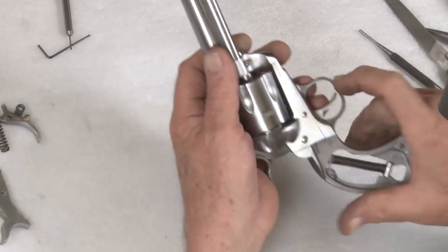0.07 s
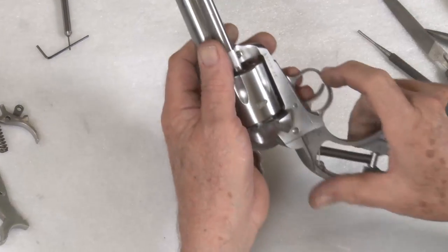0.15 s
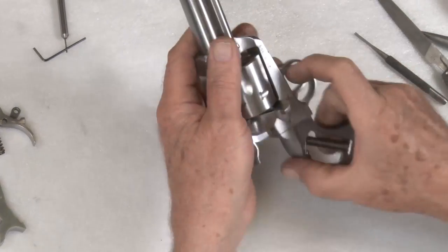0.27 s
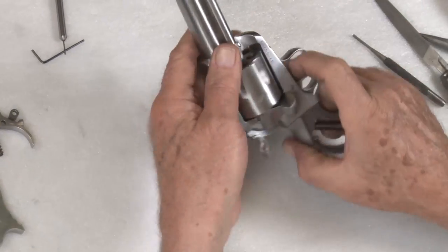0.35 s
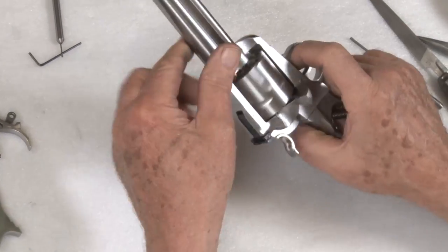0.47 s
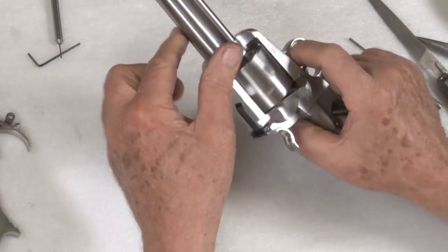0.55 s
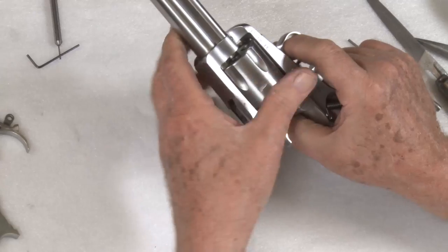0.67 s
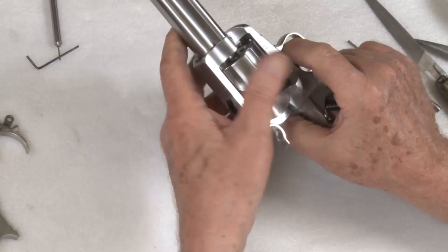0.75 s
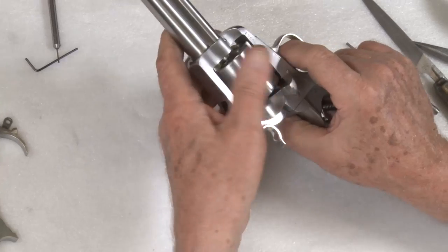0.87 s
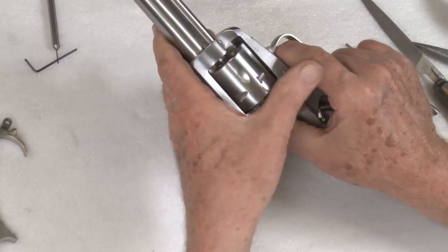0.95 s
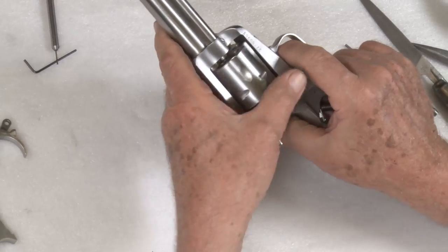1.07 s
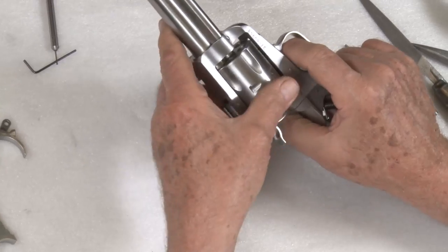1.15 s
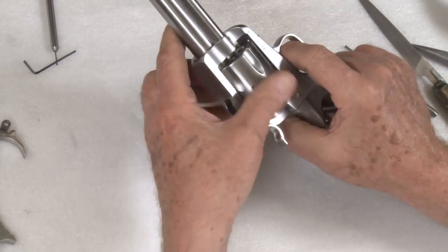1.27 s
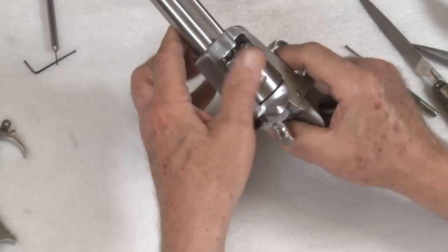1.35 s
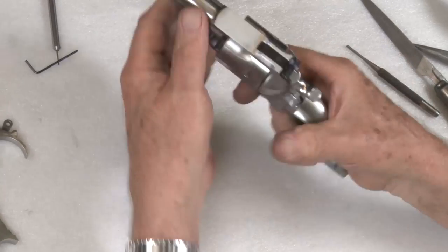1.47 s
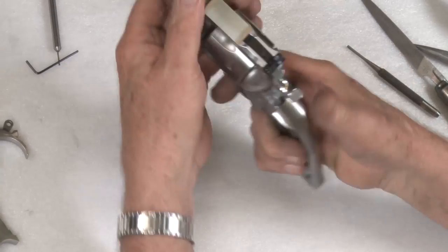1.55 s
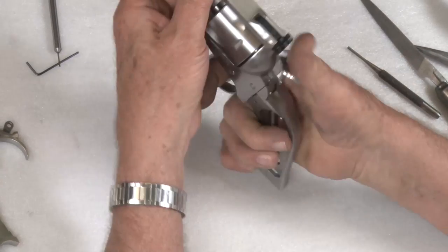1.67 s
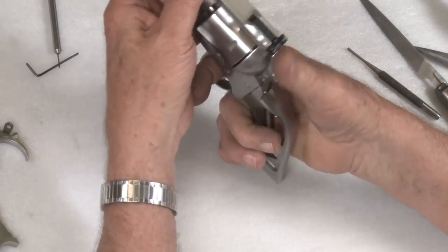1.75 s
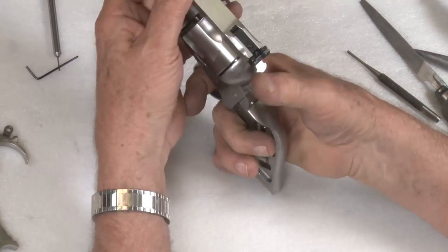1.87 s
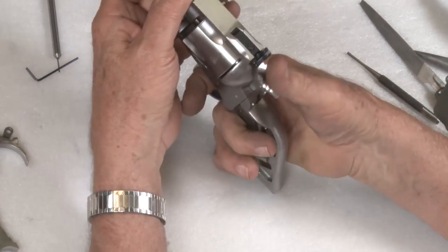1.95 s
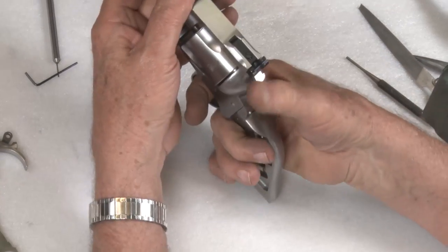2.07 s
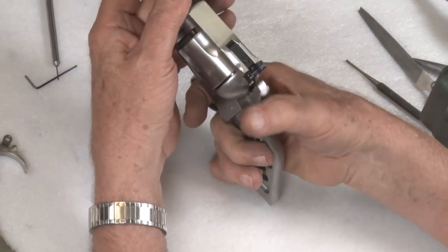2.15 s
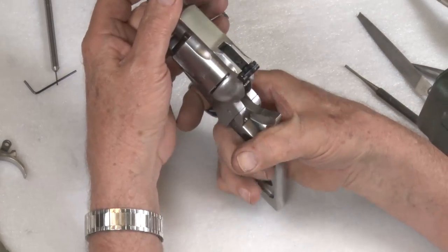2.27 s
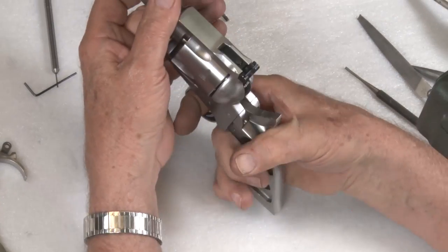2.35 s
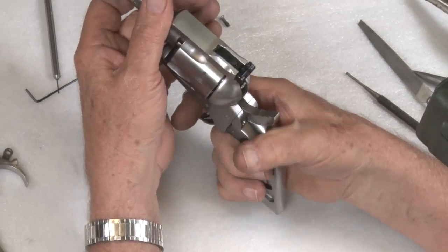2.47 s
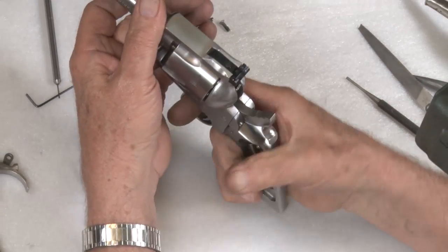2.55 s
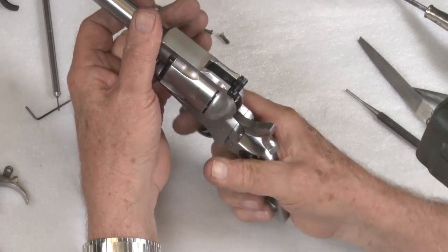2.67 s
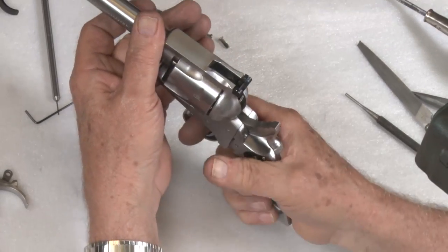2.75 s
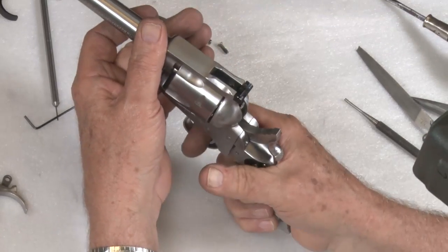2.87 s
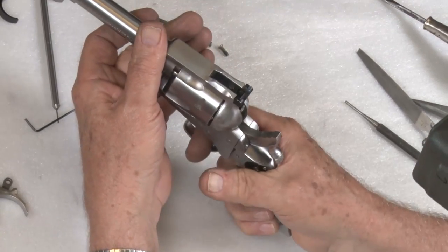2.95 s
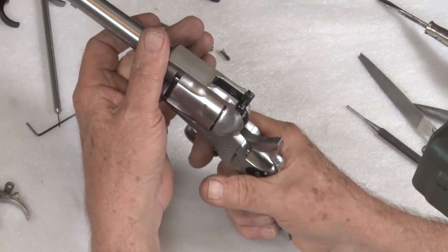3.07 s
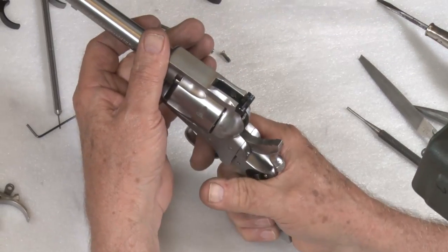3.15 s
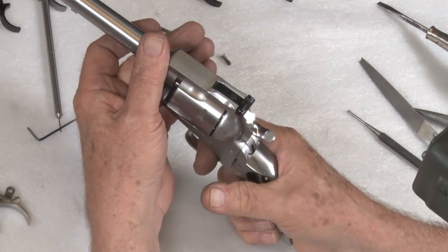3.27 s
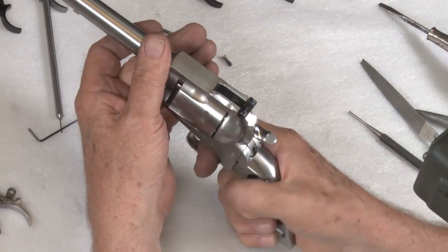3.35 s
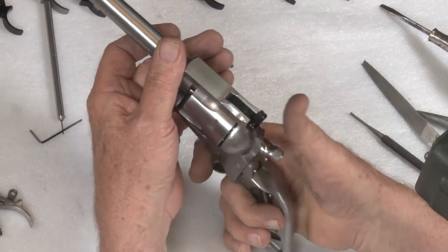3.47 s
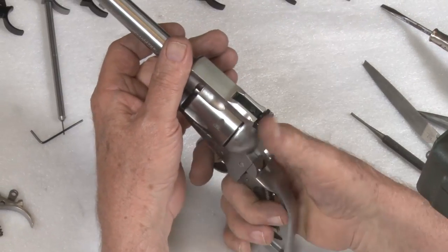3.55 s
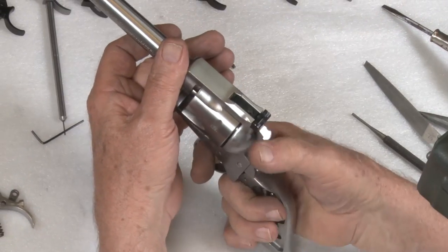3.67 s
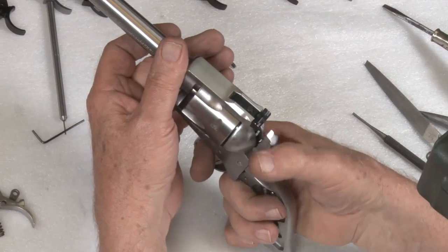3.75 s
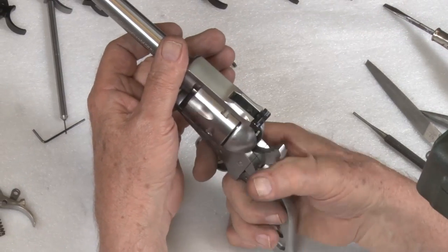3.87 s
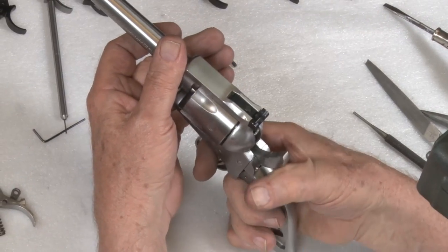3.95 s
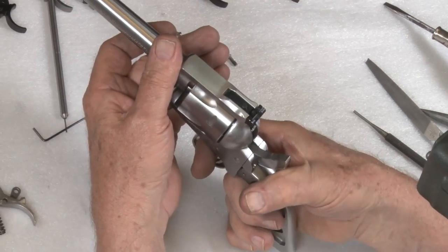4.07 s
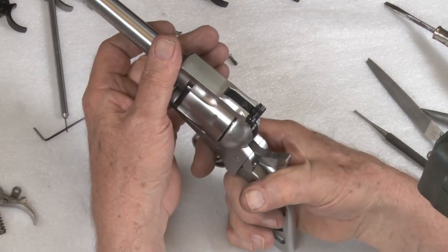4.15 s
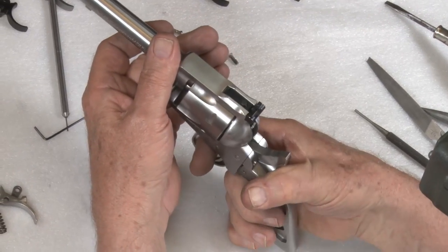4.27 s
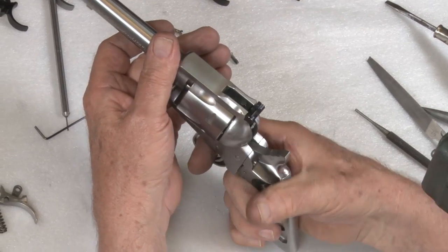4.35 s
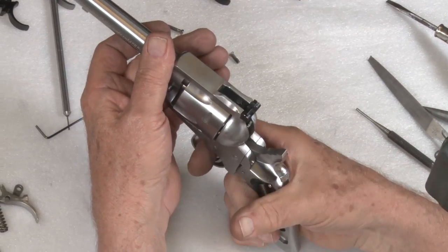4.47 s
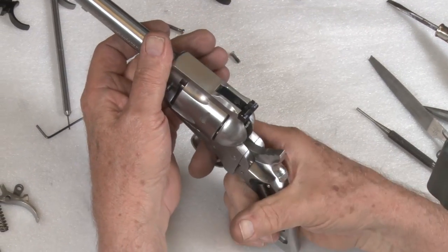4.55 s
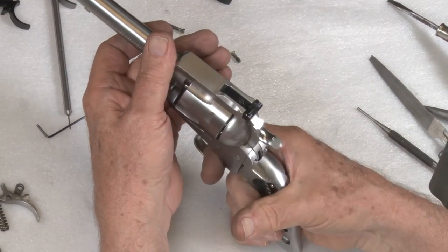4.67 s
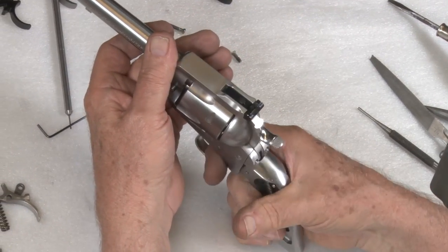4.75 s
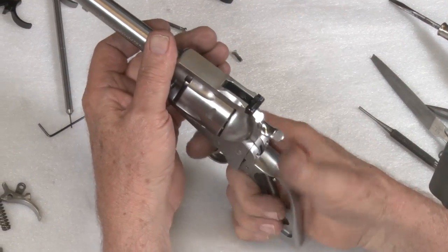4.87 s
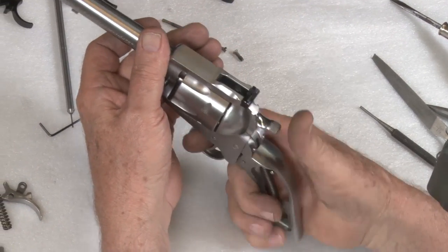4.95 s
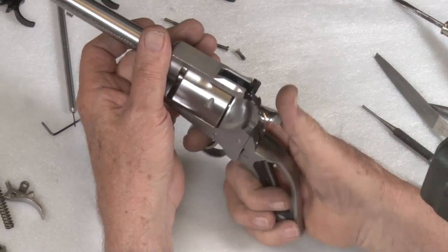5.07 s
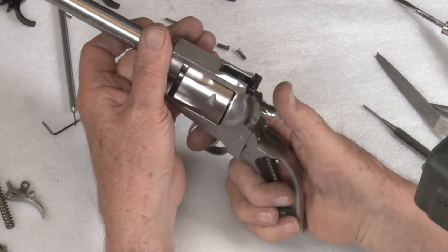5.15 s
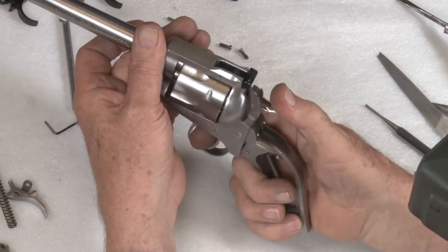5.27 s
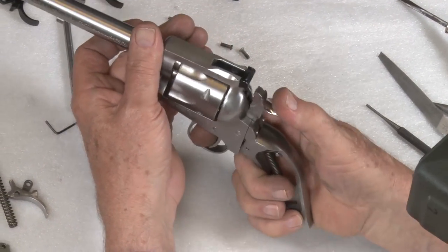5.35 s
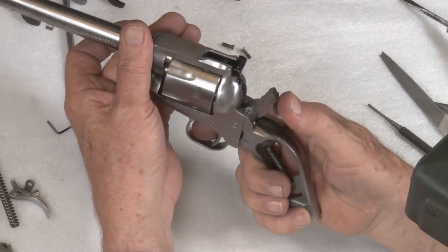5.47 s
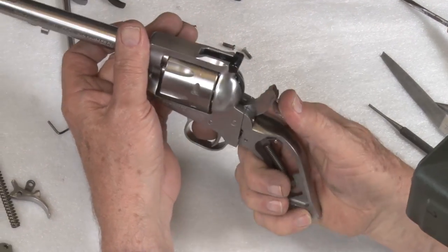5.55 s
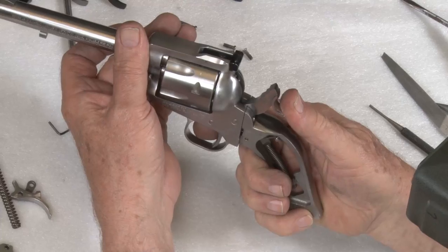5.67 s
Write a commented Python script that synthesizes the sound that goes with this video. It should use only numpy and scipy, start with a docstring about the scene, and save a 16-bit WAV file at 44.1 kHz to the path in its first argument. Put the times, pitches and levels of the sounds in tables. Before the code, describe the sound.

A steel revolver is handled very close to the microphone in a still, small workshop with faint mains hum. Skin rubs and hisses over metal from the start until about 0.5 s, with a light clink at 0.4. From 0.46 to 0.69 s, five bright ratchet clicks run quickly together, trailing a thin springy ring. After a quiet gap, a tight cluster of snaps comes at 1.2 s. Soft rubbing follows near 1.6, then several firm clicks and low handling thuds between 2.2 and 2.4 s, with duller bumps around 3.0. At 3.26 s the hammer falls with a hard, thudding clack and shimmering spring; the trigger returns sharply at 3.48. Cocking clicks at 3.9 and 4.1 lead to a second, slightly softer fall at 4.76 and return snap at 4.93. Gentle rubbing and faint ticks follow from 5.2 s, ending in a crisp double click around 5.5. Short, bright reflections follow the blows.

```python
"""A single-action revolver is worked by hand over a padded bench in a small workshop, close to the microphone.
The cylinder turns over its ratchet, then the hammer is cocked and let go: steel snaps as cracks, noise and tones.
The mainspring and the pawl's spring ring on as dense, fading noise; low fading sines make the gun's thuds.
Filtered noise makes the hands' rubbing and the still air, steady sines the faint mains hum,
and scattered reflections the room."""
import sys
import numpy as np
from scipy import signal
from scipy.fft import rfft, irfft
from scipy.io import wavfile

SR = 44100
rng = np.random.default_rng(int(sys.argv[2]) if len(sys.argv) > 2 else 0)


def unload_wav(signal):
    """Save mono or channel-first audio to the path in sys.argv[1] as 16-bit WAV at rate SR, clipped to [-1, 1]."""
    wavfile.write(
        sys.argv[1],
        SR,
        np.round(np.clip(np.atleast_2d(signal).T, -1, 1) * 32767).astype(np.int16),
    )


N = 251370
TIME = np.arange(N) / SR

# In all tables, t60 is the time a sound takes to fade by 60 dB.
# Colours are spectrum shapes and modes are resonances; their levels are relative.

# skin slides on steel: (time of full strength [s], hold [s], dull rub [dB], scrape [dB], hiss [dB])
STROKES = [(0, 0.068, -58, -65.5, -62), (0.143, 0.14, -55, -70.5, -65), (0.304, 0.13, -57, -71, -67),
           (1.615, 0.15, -68.5, -73.5, -77), (2.309, 0.082, -57.5, -71, -76), (2.78, 0.15, -65, -75.5, -87),
           (2.98, 0.23, -67.5, -81.5, -80), (5.234, 0.33, -66.5, -77, -81)]
# spectrum of the dull rub: (frequency [Hz], level [dB])
RUB_COLOUR = [(18, -35), (30, 5), (91, -2.5), (237, -3.5), (527, -13.5), (647, -13.5), (827, -14),
              (1010, -30.5), (1950, -25), (4000, -42.5), (5200, -78), (8800, -120)]
# spectrum of the skin's hiss: (frequency [Hz], level [dB])
HISS_COLOUR = [(1200, -4.5), (2100, -1), (3200, -9), (5000, -7), (6500, -10.5), (9300, -6.5),
               (11500, -18.5), (15500, -15)]
# band of the scrape, where fingertip ridges catch and slip: (low [Hz], high [Hz])
SCRAPE_HZ = (450, 2120)
# spectrum of the still air: (frequency [Hz], level [dB])
AIR_COLOUR = [(12, -20), (20, -4.5), (65, 6.5), (88, -10), (107, 1.5), (146, -10), (182, -0.5),
              (210, -19.5), (241, -7), (270, -13), (301, -12), (2080, -22.5), (2320, -28), (3250, -24),
              (16000, -32)]
# mains hum: (frequency [Hz], level [dB])
HUM = [(60, -78), (120, -76), (180, -89.5), (240, -77.5), (300, -86.5), (480, -98)]

# ranges of knock, clack, ring, edge and sizzle: (low [Hz], high [Hz])
RANGES = [(130, 700), (850, 2800), (2800, 5600), (5600, 10000), (10000, 16500)]
# resonances of the steel frame: (frequency [Hz], width [Hz], level [dB])
FRAME_MODES = [(1800, 58, -32), (2890, 100, -17), (4100, 180, 7.5), (4610, 280, 6.5), (6050, 68, -2),
               (7080, 130, 4.5), (9120, 140, 10), (9470, 280, 6), (10450, 320, -15), (12200, 160, -24),
               (12900, 170, -12), (14430, 190, 9)]
# dull taps of parts eased together: (time [s], level [dB], brightness [dB per octave], ping [Hz])
TAPS = [(0.3152, -64.5, .5, 2590), (0.4172, -43.5, 2.5, 3680), (1.208, -46.5, 4, 3720),
        (1.6156, -66, -5, 1840), (2.24, -58, 6, 5030), (2.2475, -55, -2.5, 3830), (3.838, -68, 9, 5090),
        (3.8446, -55.5, 0, 2040), (5.4562, -51, -2, 2330), (5.4608, -57, -5, 2310), (5.5253, -42, 8, 2966)]
# balance of every tap: (knock [dB], clack [dB], ring [dB], edge [dB], sizzle [dB])
TAP_DB = (-23.5, -2, 0, -20, -36)
# spectrum of the room's tail: (frequency [Hz], level [dB])
ROOM_COLOUR = [(200, 2.5), (800, -19), (2000, 0), (4000, 3), (7000, -0.5), (11000, 1.5), (15000, 5.5)]
# fading of the room's tail: (frequency [Hz], t60 [s])
ROOM_T60 = [(300, 0.51), (2000, 1), (4000, 0.78), (8000, 0.58), (14000, 0.24)]

# the pawl drops over a ratchet tooth: (time [s], level [dB], frame knock [dB], t60 [s], tooth's ping [Hz])
RATCHET = [(0.4579, -38, -5, 0.037, 7320), (0.519, -40, -17.5, 0.049, 5000),
           (0.5611, -42, -11.5, 0.059, 3070), (0.6116, -39, -10.5, 0.057, 6320),
           (0.685, -39.5, -6.5, 0.06, 13600)]
# balance of every tooth: (clack [dB], ring [dB], edge [dB], sizzle [dB])
TOOTH_DB = (-6, -0.5, 2.5, 1.5)
# resonances of the steel cylinder: (frequency [Hz], width [Hz], level [dB])
CYLINDER_MODES = [(3280, 1100, -5), (4450, 61, 7.5), (5440, 89, -2), (7300, 280, 0), (8100, 260, 1.5),
                  (9600, 180, -14), (10280, 50, 9), (11500, 86, -6), (12840, 70, 14), (14200, 110, 7),
                  (15360, 76, 7)]
# spectrum of the spring behind the pawl: (frequency [Hz], level [dB])
PAWL_COLOUR = [(1000, -9), (2400, -20), (3200, -1), (4400, 10), (7000, 5), (10000, -2), (13000, 7),
               (15500, 9)]
# fading of that spring: (frequency [Hz], t60 [s])
PAWL_T60 = [(3000, 0.64), (7000, 0.77), (14000, 0.41)]

# hands bump the gun as they shift: (time [s], level [dB], frequency [Hz])
BUMPS = [(0.563, -42.5, 100), (2.307, -42, 74), (2.321, -41, 134), (2.344, -42, 177), (2.364, -36, 52),
         (2.375, -42, 191), (2.409, -39, 64), (2.989, -49, 55), (3.053, -45.5, 57.4), (3.129, -44, 52.4)]
# the gun rocks in the grip: (frequency [Hz], level relative to the jolt [dB], t60 [s])
ROCKING = [(38.5, -10.5, 0.18), (75.6, 1.5, 0.033)]
# gate, bolt and sear snap home under their springs:
# (time [s], level [dB], frame knock [dB], brightness [dB per octave], t60 [s], ping [Hz])
SNAPS = [(1.185, -52.5, -2, 2, 0.029, 3270), (1.188, -44, 6, 0.6, 0.053, 10000),
         (1.1916, -45, -2, 5.5, 0.035, 12100), (1.204, -47, 4, 4, 0.019, 12170),
         (2.202, -55, -7, 2, 0.038, 14180), (2.2099, -56, -3.5, -2.3, 0.095, 14000),
         (2.2889, -42, 8.5, 0.7, 0.058, 1970), (2.3077, -38, 2, 1.5, 0.032, 14400),
         (2.361, -38, -4.5, -.5, 0.044, 3770), (3.7628, -61, -8, 1, 0.043, 14100),
         (3.8972, -43.5, 1, 0.9, 0.037, 5140), (3.93, -44, 2, 1.5, 0.055, 6070),
         (4.102, -43.5, 3.5, 0.9, 0.037, 12900), (4.3931, -62, -1.5, -1.3, 0.036, 2000),
         (5.3555, -59, 2, 1.7, 0.03, 4940), (5.371, -66.5, 0, 2, 0.046, 14300),
         (5.504, -42, -3.5, -.3, .05, 2240), (5.526, -44, -20, 1, 0.034, 4380)]
# balance of every snap: (knock [dB], clack [dB], ring [dB], edge [dB], sizzle [dB])
SNAP_DB = (-10.5, -3.5, 0, -3, -2)
# the hammer is let go and lands: (time [s], level [dB], grip's resonance [Hz])
FALLS = [(3.2631, -40.5, 293), (4.7564, -45, 390)]
# in each fall the sear slips, then the hammer brushes, lands and bounces twice: (time from landing [s],
# relative level [dB], frame knock [dB], brightness [dB per octave], t60 [s], ping [Hz])
FALL_CONTACTS = [(-.0117, -15.5, 3.5, -3.5, 0.15, 4450), (-.0036, -2, -4, 0, 0.028, 6360),
                 (0, 2.5, 1, -1, 0.037, 1220), (.0075, -3, 1, -2, .046, 12760),
                 (0.0108, -3, 0, 7.5, 0.053, 14940)]
# the released trigger springs forward to its stop: (time [s], level [dB], grip's resonance [Hz])
RETURNS = [(3.4821, -34, 327), (4.929, -34, 165)]
# its lever clinks past the hammer, then it hits its stop: (time from the stop [s],
# knock [dB], clack [dB], ring [dB], edge [dB], sizzle [dB], t60 [s], ping [Hz], ping [dB])
RETURN_CONTACTS = [(-.0073, -21, -25, -5, -5.5, -15, 0.043, 4686, 27),
                   (0, -7, -7, -.5, -1, -1.3, 0.031, 4120, 6)]

# lesser kicks that set the mainspring shivering: (time [s], level [dB])
SPRING_KICKS = [(1.2, -58), (2.309, -59.5), (4.931, -56.5)]
# spectrum of the mainspring's shiver: (frequency [Hz], level [dB])
SPRING_COLOUR = [(290, -75), (500, -34), (696, -13.5), (1060, -20.5), (1240, -12.5), (1530, -9.5),
                 (1800, -7), (2290, -4), (2650, -13.5), (3680, 1), (5050, -5), (7450, -1), (9790, -9),
                 (10700, -3.5), (15500, -7.5)]
# resonances of the mainspring: (frequency [Hz], width [Hz], level [dB])
SPRING_MODES = [(2000, 170, -12), (2920, 320, 9.5), (3670, 130, -3.5), (5950, 270, 0), (7340, 120, 7),
                (10700, 2100, 6.5)]
# fading of the mainspring: (frequency [Hz], t60 [s])
SPRING_T60 = [(1000, 1.46), (3500, 1.035), (7000, 0.8), (11000, 0.49), (15000, 0.41)]

STROKE_ATTACK_S, STROKE_RELEASE_S = 0.067, 0.061
HOLD_RUB_DB, HOLD_HISS_DB = -76.5, -84.5   # the hands are never quite still
GRIP_UNEVEN_DB, GRIP_SLIPS_PER_S = 2, 45
CATCHES_PER_S, CATCH_SPREAD_DB = 1500, 1
AIR_DB = -67
TAP_T60_S, TAP_PING_DB = 0.045, 18.5
TOOTH_PING_DB, SNAP_PING_DB = 10.5, 11.5
PAWL_HZ = 616   # trips of a wave along the pawl's spring each second
BUMP_T60_S = 0.059
SNAP_THUD_DB, SNAP_THUD_HZ, SNAP_THUD_T60_S = -7.5, 138, 0.03   # every snap nudges the hand a little
FALL_JOLT_DB, RETURN_JOLT_DB = 11, -5   # relative to the level of the blow
GRIP_DB, GRIP_T60_S = -9.5, 0.062   # the grip rings briefly, at a pitch set by the hold
FALL_SHIVER_DB, FALL_SHIVER_LAG_S = -44.5, 0.0053   # every fall of the hammer shakes the mainspring hard
CUTOFF_HZ = 15900


def from_db(db):
    """Turn decibels into gain."""
    return 10 ** (np.asarray(db) / 20)


def rms_one(x):
    """Scale a sound to an rms (average strength) of 1."""
    return x / np.sqrt(np.mean(x ** 2) + 1e-20)


def at_hz(points, hz):
    """Read a table between its points, on a log-frequency axis."""
    table_hz, value = np.transpose(points)
    return np.interp(np.log(np.maximum(hz, 1)), np.log(table_hz), value)


def add(out, s, sound):
    """Mix a sound in at time s."""
    start = max(int(s * SR), 0)
    out[start:start + len(sound)] += sound[:N - start]


def delayed(x, s):
    """Play the same sound s seconds later."""
    t = TIME[:len(x)]
    return np.interp(t - s, t, x, left=0)


def bandpass(x, low, high, order=3):
    """Keep mainly the sound between two frequencies."""
    return signal.sosfilt(signal.butter(order, [low, high], "band", fs=SR, output="sos"), x)


def resonate(x, modes):
    """Pass a sound through side-by-side resonances; wider ones die away sooner."""
    out = 0
    for hz, width, db in modes:
        r = np.exp(-np.pi * width / SR)
        top = np.array([1, 0, -1]) * (1 - r * r) / 2
        bottom = [1, -2 * r * np.cos(2 * np.pi * hz / SR), r * r]
        out = out + from_db(db) * signal.lfilter(top, bottom, x)
    return out


def tone(hz, t60):
    """A fading sine, scaled so that its spectrum peaks at about 1."""
    n = np.arange(SR // 6)
    life = t60 * SR / np.log(1000)
    return 2 / life * np.exp(-n / life) * np.sin(2 * np.pi * hz * n / SR)


def noise(colour):
    """Steady noise with a given spectrum and an rms of 1."""
    hz = np.arange(N // 2 + 1) * SR / N
    spectrum = rfft(rng.standard_normal(N)) * from_db(at_hz(colour, hz))
    return rms_one(irfft(spectrum, N))


def drift(rate):
    """A random wander with an rms of 1, heading for a new value rate times a second."""
    knots = np.arange(0, N / SR + 1, 1 / rate)
    return rms_one(np.interp(TIME, knots, rng.standard_normal(len(knots))))


def dense_ring(colour, t60s):
    """Countless close modes heard as noise, each range dying at its own rate; the total energy is 1."""
    t, hz = TIME[:SR], np.arange(SR // 2 + 1)
    spectrum = rfft(rng.standard_normal(SR)) * from_db(at_hz(colour, hz))
    edges = np.geomspace(100, 17000, 25)
    out = np.zeros(SR)
    for low, high in zip(edges, edges[1:]):
        band = irfft(spectrum * (hz >= low) * (hz < high), SR)
        t60 = at_hz(t60s, np.sqrt(low * high))
        out += band * from_db(-60 * t / t60)
    return out / np.linalg.norm(out)


def tilted(levels_db, db, tilt_db, knock_db=0):
    """Levels of a blow's five ranges; a harder contact tilts them up around the ring range."""
    octaves = np.log2(np.prod(RANGES, axis=1)) / 2   # middle of each range
    knock, *rest = np.array(levels_db) + db + tilt_db * (octaves - octaves[2])
    return (knock + knock_db, *rest)


def snap(row, modes, modes_db, crack):
    """One steel part lands on another: a crack, then fading noise and tones, damped by the hand."""
    knock_db, *levels_db, t60, ping_hz, ping_db = row
    t = TIME[:SR // 6]
    touch = np.zeros(len(t))
    touch[0] = 1

    # the touch feeds many small modes, heard as noise that fades
    fade = from_db(-60 * t / t60)
    body = crack * touch + fade * rng.standard_normal(len(t))
    body = body / np.linalg.norm(body)
    body = body + from_db(ping_db) * tone(ping_hz, 0.5 * t60)
    for hz, width, db in modes:
        mode_gain = from_db(db + modes_db + rng.normal(0, 6.3))   # each blow excites the modes differently
        body = body + mode_gain * tone(hz, np.log(1000) / (np.pi * width))

    # the point of contact decides how strongly each range speaks in the first 6 ms
    attack = int(0.006 * SR)
    knock, *parts = [bandpass(body, low, high) for low, high in RANGES]
    ring = sum(from_db(db) * part / np.std(part[:attack]) for db, part in zip(levels_db, parts))
    knock = knock * from_db(-60 * t / 0.059)   # the palm soaks up the lows first
    return ring + from_db(knock_db) * knock / np.std(knock[:attack])


def hands():
    """Skin slides unevenly over the gun: each stroke swells, holds and dies away."""
    rub, scrape, hiss = from_db(HOLD_RUB_DB), 0, from_db(HOLD_HISS_DB)
    for s, length, rub_db, scrape_db, hiss_db in STROKES:
        swell = np.clip(1 + (TIME - s) / STROKE_ATTACK_S, 0, 1)
        stroke = swell * np.exp(-np.maximum(TIME - s - length, 0) / STROKE_RELEASE_S)
        rub = np.maximum(rub, from_db(rub_db) * stroke)
        scrape = np.maximum(scrape, from_db(scrape_db) * stroke)
        hiss = np.maximum(hiss, from_db(hiss_db) * stroke)
    grip_db = GRIP_UNEVEN_DB * drift(GRIP_SLIPS_PER_S)

    # the ridges of the fingertips catch at random moments
    catches = (rng.random(N) < CATCHES_PER_S / SR) * rng.choice([-1, 1], N)
    catches = catches * from_db(CATCH_SPREAD_DB * rng.standard_normal(N))
    grain = rms_one(bandpass(catches + 1e-18, *SCRAPE_HZ, order=2))
    sliding = from_db(grip_db) * (rub * noise(RUB_COLOUR) + scrape * grain)
    return sliding + hiss * from_db(0.89 * grip_db) * noise(HISS_COLOUR)


def background():
    """Still workshop air as steady noise, and mains hum as steady sines."""
    hum = np.zeros(N)
    for hz, db in HUM:
        hum += from_db(db) * np.sqrt(2) * np.sin(2 * np.pi * (hz * TIME + rng.random()))
    return hum + from_db(AIR_DB) * noise(AIR_COLOUR)


def taps():
    """Parts pushed by the fingers meet slowly: hardly any crack, and little knock or sizzle."""
    out = np.zeros(N)
    for s, db, tilt, ping_hz in TAPS:
        row = (*tilted(TAP_DB, db, tilt), TAP_T60_S, ping_hz, TAP_PING_DB)
        add(out, s, snap(row, FRAME_MODES, modes_db=-5, crack=1.2))
    return out


def workshop(x, early_db, early_t60, tail_db):
    """Sound scatters quickly from the bench and tools, with the longer tail of the room."""
    t = TIME[:SR]
    arrival = np.clip(t / 0.0053 - 0.3, 0, 1)   # reflections come in gradually after a short gap
    early = bandpass(rng.standard_normal(SR), 1500, 10400) * from_db(-60 * t / early_t60) * arrival
    early = from_db(early_db) * early / np.linalg.norm(early)
    tail = from_db(tail_db) * dense_ring(ROOM_COLOUR, ROOM_T60) * arrival
    return signal.fftconvolve(x, early + tail)[:N]


def cylinder():
    """The pawl drops over the ratchet teeth as the cylinder turns; its spring throws each blow back once."""
    out = np.zeros(N)
    for s, db, knock_db, t60, ping_hz in RATCHET:
        row = (db + knock_db, *(db + np.array(TOOTH_DB)), t60, ping_hz, TOOTH_PING_DB)
        add(out, s, snap(row, CYLINDER_MODES, modes_db=-1, crack=3.7))
    return 0.9 * out + 0.35 * delayed(out, 1 / PAWL_HZ)


def pawl_spring(level_db, echo):
    """Each tooth plucks the pawl's little spring; a wave running up and down it gives even overtones."""
    out = np.zeros(N)
    for s, *_ in RATCHET:
        pluck = dense_ring(PAWL_COLOUR, PAWL_T60)
        shiver = sum(echo ** k * delayed(pluck, k / PAWL_HZ) for k in range(3))
        add(out, s, from_db(level_db) * shiver / np.std(shiver[:SR // 20]))
    return out


def jolts():
    """The gun rocks in the grip at falls and returns, and thuds softly at snaps and when the hands shift."""
    thuds = [(s, hz, db, BUMP_T60_S) for s, db, hz in BUMPS]
    for s, db, knock_db, *_ in SNAPS:
        thuds.append((s, SNAP_THUD_HZ, db + knock_db + SNAP_THUD_DB, SNAP_THUD_T60_S))
    for blows, jolt_db in ((FALLS, FALL_JOLT_DB), (RETURNS, RETURN_JOLT_DB)):
        for s, db, grip_hz in blows:
            for hz, mode_db, t60 in [*ROCKING, (grip_hz, GRIP_DB, GRIP_T60_S)]:
                thuds.append((s, hz, db + jolt_db + mode_db, t60))

    out, t = np.zeros(N), TIME[:SR // 3]
    for s, hz, db, t60 in thuds:
        add(out, s, from_db(db - 60 * t / t60) * np.sin(2 * np.pi * hz * t))
    return out


def lockwork():
    """Hammer, sear and trigger snap against the frame; all falls share one set of contacts, as do all returns."""
    strikes = list(SNAPS)
    for s, db, _ in FALLS:
        for lag, step_db, *rest in FALL_CONTACTS:
            strikes.append((s + lag, db + step_db, *rest))

    blows = []
    for s, db, knock_db, tilt, t60, hz in strikes:
        blows.append((s, *tilted(SNAP_DB, db, tilt, knock_db), t60, hz, SNAP_PING_DB))
    for s, db, _ in RETURNS:
        for lag, *levels_db, t60, hz, ping_db in RETURN_CONTACTS:
            blows.append((s + lag, *(db + np.array(levels_db)), t60, hz, ping_db))

    out = np.zeros(N)
    for s, *row in blows:
        add(out, s, snap(row, FRAME_MODES, modes_db=-5.5, crack=2.7))
    return out


def mainspring():
    """The coil spring, suddenly slack, rings on in a bright shimmer."""
    kicks = list(SPRING_KICKS)
    kicks += [(s + FALL_SHIVER_LAG_S, FALL_SHIVER_DB) for s, *_ in FALLS]
    out = np.zeros(N)
    for s, db in kicks:
        shiver = dense_ring(SPRING_COLOUR, SPRING_T60)
        shiver = shiver + from_db(-5.5) * resonate(shiver, SPRING_MODES)
        add(out, s, from_db(db) * shiver / np.std(shiver[:SR // 20]))   # level set over the first 50 ms
    return out


def scene():
    """The gun close by, with the room around it."""
    gun = cylinder() + lockwork() + taps()
    room = workshop(gun, early_db=-19, early_t60=0.11, tail_db=-18)
    springs = mainspring() + pawl_spring(level_db=-63, echo=0.48)
    return (gun + room + springs + jolts() + hands() + background())[None]


def record(dry):
    """The microphone loses the deepest bass; the top is cut steeply."""
    heard = signal.sosfilt(signal.butter(2, 22, "high", fs=SR, output="sos"), dry)
    return signal.sosfilt(signal.ellip(10, 0.3, 70, CUTOFF_HZ, fs=SR, output="sos"), heard)


dry = scene()
out = record(dry)
unload_wav(out)
```